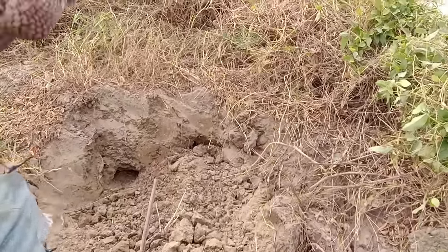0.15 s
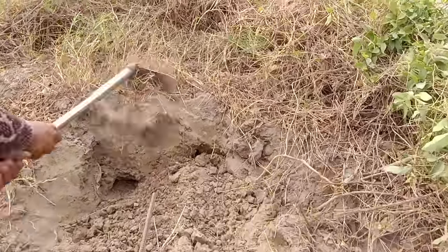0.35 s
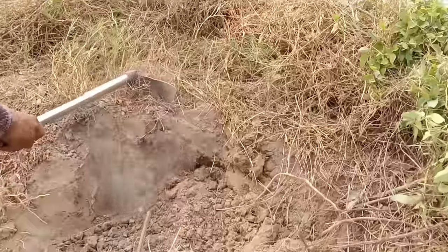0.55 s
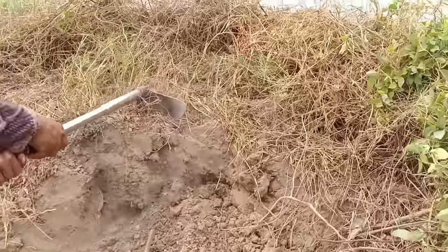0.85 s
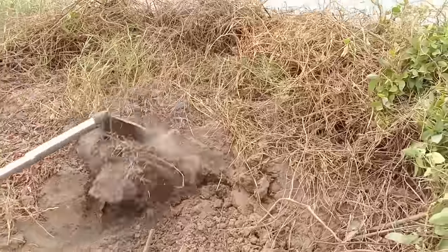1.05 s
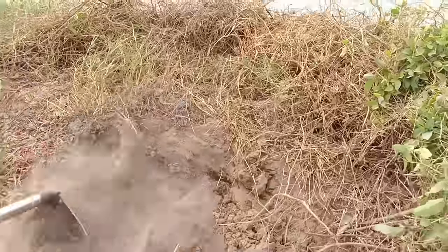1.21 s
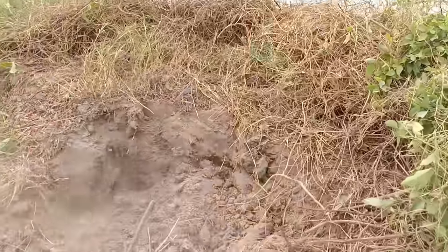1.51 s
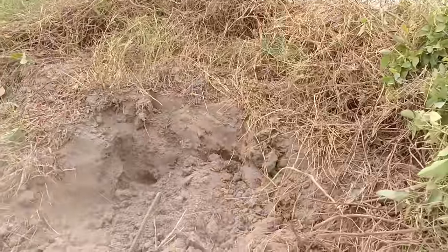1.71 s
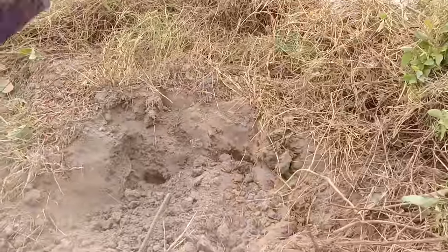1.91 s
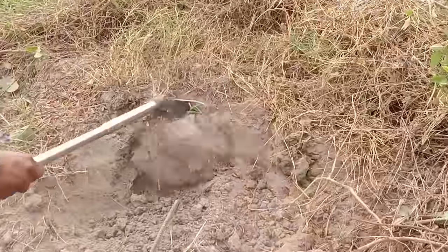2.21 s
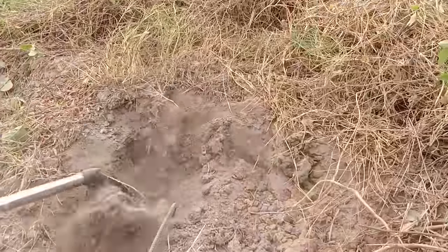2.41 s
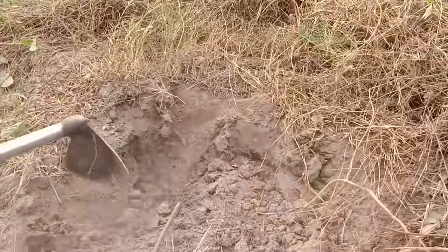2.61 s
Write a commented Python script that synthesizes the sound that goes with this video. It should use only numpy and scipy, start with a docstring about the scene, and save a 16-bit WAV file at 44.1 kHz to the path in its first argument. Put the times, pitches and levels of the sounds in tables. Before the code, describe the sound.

A metal hoe hits dry soil at 0.24 s with a sharp crunch, low thud and faint ring. Quiet stalk snaps lead to a gritty drag at 0.88-1.3 s, with cracking clods and stone scrapes clinking on the blade. Crumbs settle; tiny bird chirps begin near 1.55. A second, softer-edged chop lands at 2.06, dragging follows at 2.2-2.45, then the blade sings while earth slides over faint low rumble.

```python
"""A low rumble lies under it all; a steel hoe chops through stalks into dry soil, then dry stalks snap high.
The hoe is dragged back: clods crumble and crack, and scraping grit makes the blade ring.
A bird whistles falling and rising notes around a second chop and drag; then the lifted blade sings as earth slides.
Soil and stalks are coloured clicks and hiss, steel and ground decaying sine modes, the bird gliding sines."""
import sys
import numpy as np
from scipy import signal
from scipy.fft import rfft, irfft, next_fast_len
from scipy.io import wavfile
from scipy.ndimage import uniform_filter1d, map_coordinates

SR = 44100
rng = np.random.default_rng(int(sys.argv[2]) if len(sys.argv) > 2 else 0)


def wav_record(signal):
    """Record a signal, one row per channel, as 16-bit PCM in the file named by sys.argv[1]."""
    frames = np.transpose(np.atleast_2d(signal))
    bounded = np.clip(frames, -1, 1)
    # unit amplitude maps onto the largest positive 16-bit level
    quanta = np.round(bounded * 32767).astype(np.int16)
    wavfile.write(sys.argv[1], SR, quanta)


N = 121275
T = np.arange(N) / SR


def amp(db):
    """dB to amplitude."""
    return 10 ** (np.asarray(db) / 20)


def unit(x):
    """x at rms 1."""
    return x / np.sqrt(np.mean(x ** 2) + 1e-20)


def impulse(s):
    """A single unit sample at time s."""
    return 1. * (np.arange(N) == round(s * SR))


def along(points, hz, below_db, above_db):
    """(Hz, dB) points interpolated on a log frequency axis; None holds the end value."""
    f, db = np.transpose(points)
    return np.interp(np.log(hz + 1), np.log(f), db, below_db, above_db)


def filtered(x, response):
    """x times a zero-phase response of frequency."""
    m = next_fast_len(N + SR)
    return irfft(rfft(x, m) * response(np.fft.rfftfreq(m, 1 / SR)), m)[:N]


def coloured(x, points, tilt_db_per_oct=0, above_db=None):
    """x shaped by (Hz, dB) points and a tilt about 2 kHz, scaled to rms 1 below 9 kHz."""
    def response(hz):
        return amp(along(points, hz, -90, above_db) + tilt_db_per_oct * np.log2(hz / 2000 + .01))
    y = filtered(x, response)
    return y / np.std(filtered(y, lambda hz: hz < 9000))


def wobble(knots_per_s):
    """A smooth random curve."""
    return map_coordinates(rng.standard_normal(N // 10), [T * knots_per_s])


def gritty(per_s, spread_db, hiss):
    """Random clicks of uneven size at rms 1, plus hiss at the given rms."""
    sizes = amp(spread_db * np.minimum(rng.exponential(size=N), 3))
    clicks = (rng.random(N) < per_s / SR) * rng.standard_normal(N) * sizes
    return unit(clicks) + hiss * rng.standard_normal(N)


def patchy(x, depth_db):
    """x with random patches of gain in time and frequency, at rms 1."""
    z = signal.stft(x, nperseg=256)[2]
    patches = uniform_filter1d(rng.standard_normal(z.shape), size=5, axis=0)
    patches = uniform_filter1d(patches, size=6, axis=1)
    return unit(signal.istft(z * amp(depth_db * unit(patches)), nperseg=256)[1][:N])


def ring(x, modes):
    """x drives (Hz, dB, t60) modes; a unit impulse starts each at its dB."""
    t = T[:SR // 2]
    response = sum(amp(db - 60 * t / t60) * np.sin(2 * np.pi * hz * t) for hz, db, t60 in modes)
    return signal.fftconvolve(x, response)[:N]


# chops: (meets stalks [s], meets soil [s], crunch level [dB], stalks re crunch [dB], hold [s],
#         fade t60 [s], crunch tilt [dB/octave], thud gain [dB], ring gain [dB])
CHOP_EVENTS = [(0.223, 0.242, -9.5, -3, 0.0071, 0.0075, 0, -24, -30.5),
               (2.047, 2.0619, -10.5, -6.5, 0.0043, 0.042, -3.5, -24, -30.5)]
# crunch spectrum: (frequency [Hz], level [dB])
CRUNCH_SPECTRUM = [(150, -17.5), (900, -2), (1300, -6), (2000, -5.5), (2900, -8), (3500, -2.5), (6000, -13)]
# torn stalks spectrum: (frequency [Hz], level [dB])
STALK_SPECTRUM = [(600, -8), (3200, -7), (4200, 10.5), (6400, -0.5)]
# ground modes: (frequency [Hz], relative level [dB], t60 [s])
GROUND_MODES = [(65, -31, 0.17), (125.2, -0.5, 0.15), (196.4, 8.5, 0.051)]
# blade modes: (frequency [Hz], edge-struck rel. level [dB], face-scraped rel. level [dB], free t60 [s])
BLADE_MODES = [(965, -6, -6, .28), (1480, -25, -10, .2), (1930, -25, -13, .15), (3480, -22, -5, .25),
               (3812, -12, -36, 1.1), (4182, -14, -4, .4), (4435, -30, -3, .2), (4490, -1, -30, .35),
               (5210, -24, -6, .15), (5555, -24, -3, .33), (5916, -24, -12, .3), (6110, -14, -4, .15)]
STALK_RISE_DB = 48
SETTLE_DB, SETTLE_T60_S = -9.5, 0.05  # loose earth after a chop
CHOP_T60_SHARE = 0.71  # of the blade's free t60, left in the soil


def chops():
    """The blade tears stalks, crunches into soil, thuds the ground modes and rings its own."""
    out = np.zeros(N)
    for start, s, db, stalk_db, hold, fade, tilt_db, thud_db, ring_db in CHOP_EVENTS:
        after = np.maximum(T - s - hold, 0)
        rise_db = STALK_RISE_DB * np.minimum((T - s) / (s - start), 0)
        stalk_env = amp(stalk_db + rise_db - 60 * after / fade) * (T > start)
        attack = np.clip((T - s) / .001, 0, 1)
        crunch_env = attack * (amp(-60 * after / fade) + amp(SETTLE_DB - 60 * after / SETTLE_T60_S))
        stalks = stalk_env * coloured(rng.standard_normal(N), STALK_SPECTRUM)
        crunch = crunch_env * coloured(gritty(5600, 2.1, hiss=0.98), CRUNCH_SPECTRUM, tilt_db)
        out += amp(db) * (stalks + crunch)
        blow = impulse(s + hold / 2)
        modes = [(hz, ring_db + struck_db + rng.normal(0, 0.77), t60 * CHOP_T60_SHARE)
                 for hz, struck_db, _, t60 in BLADE_MODES]
        out += amp(thud_db) * ring(blow, GROUND_MODES) + ring(blow, modes)
    return out


# moving earth and dry leaves: (time [s], grit level [dB], clods level [dB], fine dust level [dB])
EARTH_LEVELS = [(0, -58, -59, -65.5), (0.298, -49, -53, -51), (0.36, -55, -67, -68), (0.52, -60, -62, -64),
                (0.659, -48.5, -61, -53.5), (0.711, -54.5, -66, -61.5), (0.801, -57, -68.5, -51.5),
                (0.879, -35.5, -63, -38), (0.902, -28.5, -35.5, -40.5), (0.962, -30, -34, -27.5),
                (1.04, -30, -45.5, -38.5), (1.1, -40, -53.5, -42), (1.141, -38.5, -63, -47),
                (1.16, -27.5, -36.5, -31.5), (1.24, -35, -43.5, -43.5), (1.32, -40.5, -64.5, -52),
                (1.375, -41, -39, -55), (1.43, -47, -61, -60), (1.54, -52, -53, -52.5),
                (1.65, -50, -57.5, -56.5), (1.728, -57, -45, -61.5), (1.787, -58, -56, -65.5),
                (1.878, -53, -54, -54.5), (1.96, -60.5, -65.5, -64), (2.121, -49.5, -54, -60.5),
                (2.17, -38, -57.5, -53), (2.221, -31.5, -49.5, -48), (2.289, -46, -66, -59),
                (2.303, -19.5, -32.5, -34.5), (2.349, -22.5, -30, -32.5), (2.412, -31.5, -34.5, -39),
                (2.548, -46, -81, -54), (2.75, -64, -60.5, -65)]
# grit spectrum: (frequency [Hz], level [dB])
GRIT_SPECTRUM = [(1100, -10.5), (1700, -6.5), (4300, 1), (6600, -1), (7400, -18.5)]
# clods spectrum: (frequency [Hz], level [dB])
CLOD_SPECTRUM = [(120, -18), (220, -9), (330, -8), (560, -1.5), (1300, -7), (2400, -5.5)]
# fine dust spectrum: (frequency [Hz], level [dB])
DUST_SPECTRUM = [(6300, -13.5), (8000, -8.5)]
LOADED_T60_S, LOADED_DB = 0.091, -10  # blade under soil: mode t60, level in the grit


def drags():
    """Grit, clods and dust move in uneven grains; grit also drives the damped blade."""
    s, *columns = np.transpose(EARTH_LEVELS)
    grit_env, clod_env, dust_env = [amp(np.interp(T, s, db)) for db in columns]
    lumps = amp(2 * wobble(120))
    grains = gritty(1200, 3.5, hiss=0.9)
    loaded_blade = unit(ring(grains, [(hz, db, LOADED_T60_S) for hz, _, db, _ in BLADE_MODES]))
    grit = coloured(grains, GRIT_SPECTRUM, above_db=-87) + amp(LOADED_DB) * loaded_blade
    clods = coloured(gritty(400, 4.8, hiss=1.53), CLOD_SPECTRUM, above_db=-80.5)
    dust = coloured(gritty(2500, 2.4, hiss=0.88), DUST_SPECTRUM)
    out = grit_env * lumps * patchy(grit, depth_db=3)
    out += clod_env * lumps * patchy(clods, depth_db=2)
    return out + dust_env * dust + slide(lumps)


SLIDE_START_S, SLIDE_DB, SLIDE_T60_S, SLIDE_HZ = 2.448, -37.5, 0.7, 356


def slide(lumps):
    """Earth slides back: resonant grit, a dull rumble sharing the drag's lumps."""
    env = amp(SLIDE_DB - 60 * (T - SLIDE_START_S) / SLIDE_T60_S)
    env = env * np.clip(20 * (T - SLIDE_START_S), 0, 1)
    grit = signal.lfilter(*signal.iirpeak(SLIDE_HZ, 1, SR), gritty(510, 1.1, hiss=1))
    return env * lumps * unit(grit)


# soft clods landing: (time [s], level [dB], pitch [Hz])
CLOD_THUMPS = [(0.931, -33, 206.4), (1.175, -44.5, 219), (1.383, -47.5, 241)]
THUMP_T60_S = 0.15


def thumps():
    """Each landing clod sounds one low decaying sine."""
    return sum(ring(impulse(s), [(hz, db, THUMP_T60_S)]) for s, db, hz in CLOD_THUMPS)


# stones on the blade: (time [s], fade t60 [s], blow level [dB], mode tilt [dB/octave])
STONE_SCRAPES = [(1.025, 0.09, -25.5, -5), (1.036, .06, -16, -3), (1.157, 0.064, -16, 7),
                 (1.176, 0.14, -17.5, 4.5), (1.209, 0.093, -20.5, 9), (2.301, 0.032, -29, -1.5),
                 (2.325, 0.059, -24, 0), (2.379, 0.024, -28.5, 8), (2.452, 0.15, -22.5, 3)]
SING_START_S, SING_DB = 2.47, -29  # the lifted blade
PRESSED_T60_SHARE, FREE_RING_DB = .17, -14  # t60 share under a stone; level of the free ring
RASP_DB = 3  # broad grit under the modes


def scrapes():
    """Stones drive blade modes with grit: damped clink, weak free ring; lifted, the two longest modes sing."""
    longest = sorted(BLADE_MODES, key=lambda mode: mode[-1])[-2:]
    out = ring(impulse(SING_START_S), [(hz, SING_DB + db, t60) for hz, db, _, t60 in longest])
    for s, fade, db, tilt_db in STONE_SCRAPES:
        drive = (T > s) * amp(-60 * np.abs(T - s) / fade) * gritty(2500, 0.8, hiss=0.66)
        drive = amp(db) * drive / np.linalg.norm(drive)
        modes = [(hz, face_db + tilt_db * np.log2(hz / 4000) + rng.normal(0, 1.1), t60)
                 for hz, _, face_db, t60 in BLADE_MODES]
        pressed = [(hz, mode_db, t60 * PRESSED_T60_SHARE) for hz, mode_db, t60 in modes]
        free = [(hz, mode_db + FREE_RING_DB, t60) for hz, mode_db, t60 in modes]
        out += ring(drive, pressed + free)
        out += amp(RASP_DB) * np.std(drive) * coloured(drive, GRIT_SPECTRUM, above_db=-43.5)
    return filtered(out, lambda hz: 1 / (1 + (750 / (hz + 1)) ** 8))  # thin steel has no bass


# clods and stalks cracking: (time [s], peak level [dB], pitch [Hz])
CRACK_EVENTS = [(0.342, -35, 3500), (0.61, -35.5, 1450), (0.89, -15, 3500), (0.899, -21, 4500),
                (0.9145, -12, 4000), (0.915, -19, 950), (0.92, -10, 4200), (0.9425, -13, 4800),
                (0.953, -14, 3900), (0.9695, -14, 4000), (0.972, -9, 5500), (1.005, -16, 2200),
                (1.085, -19, 1800), (1.373, -20, 1490), (1.386, -26, 4000), (1.405, -23, 2010),
                (1.437, -32, 2500), (1.53, -35, 3000), (1.656, -33, 3640), (2.198, -18, 4190),
                (2.205, -27, 950), (2.363, -11, 3500), (2.383, -11, 4500), (2.636, -35, 1500)]
CRACK_T60_S = .005  # of the noise fed to the resonance


def cracks():
    """A decaying noise burst through a broad resonance per crack."""
    out, t = np.zeros(N + SR), T[:SR // 20]
    for s, db, hz in CRACK_EVENTS:
        burst = amp(-60 * t / CRACK_T60_S) * rng.standard_normal(len(t))
        crack = signal.lfilter(*signal.iirpeak(hz, 1.2, SR), burst)
        out[round(s * SR):][:len(t)] += amp(db) * crack / np.abs(crack).max()
    return out[:N]


# dry stalks snapping: (time [s], level [dB])
SNAP_EVENTS = [(0.38, -34.5), (0.387, -38.5), (0.5359, -32.5), (0.5399, -39), (0.564, -38), (0.5707, -34),
               (0.5863, -39.5), (0.8353, -20.5)]
SNAP_HZ, SNAP_HALF_WIDTH_HZ, SNAP_RISE_S = 7960, 530, 0.0029


def snaps():
    """Bell-shaped bursts of narrow high noise over a faint broad hiss."""
    env = np.zeros(N)
    for s, db in SNAP_EVENTS:
        env += amp(db) * np.exp(-((T - s) / SNAP_RISE_S - 1) ** 2 * 2)

    def band(hz):
        return 1 / (1 + ((hz - SNAP_HZ) / SNAP_HALF_WIDTH_HZ) ** 2) + 0.04 * (hz > 3000)
    return env * unit(filtered(rng.standard_normal(N), band))


# falling notes: (time [s], level [dB], start pitch [Hz])
FALLING_NOTES = [(1.708, -37, 3500), (1.862, -25, 3806), (2.019, -21, 3860), (2.169, -25, 4090),
                 (2.485, -23.5, 3960)]
# rising notes: (time [s], level [dB], start pitch [Hz])
RISING_NOTES = [(1.561, -36, 1554), (1.75, -37.5, 1763), (1.904, -35.5, 1846), (2.53, -38, 1816)]
# short pips: (time [s], level [dB], pitch [Hz])
PIP_NOTES = [(2.572, -39.5, 3507), (2.728, -39, 3450)]
FALL_S, FALL_HZ_PER_S, FALL_FADE_DB_PER_NOTE = 0.022, 105000, 59  # fade runs from 0.2 to 0.5 of the note
RISE_S, RISE_HZ, RISE_TOP_SHARE = 0.0232, 603, 0.806  # length, arch height, share of the note at its top
PIP_S = .018
ECHO_DB, ECHO_T60_S = -3.5, 0.039


def bird():
    """Gliding sines: steep fading falls, small arches, level pips; the bushes smear them."""
    out = np.zeros(N)

    def note(s, length, hz, db):
        u = np.clip((T - s) / length, 0, 1)
        env = amp(db(u)) * np.minimum(1, 6 * np.sin(np.pi * u))
        return env * np.sin(2 * np.pi * np.cumsum(hz(u)) / SR)
    for s, db, hz in FALLING_NOTES:
        out += note(s, FALL_S, lambda u: hz - FALL_HZ_PER_S * FALL_S * u,
                    lambda u: db - FALL_FADE_DB_PER_NOTE * np.clip(u - .2, 0, .3))
    for s, db, hz in RISING_NOTES:
        out += note(s, RISE_S, lambda u: hz + RISE_HZ * (1 - (1 - u / RISE_TOP_SHARE) ** 2),
                    lambda u: db - 25 * (u - .55) ** 2)
    for s, db, hz in PIP_NOTES:
        out += note(s, PIP_S, lambda u: hz + 0 * u, lambda u: db - 5 * u)
    t = T[:SR // 4]
    tail = amp(-60 * t / ECHO_T60_S) * rng.standard_normal(len(t)) * (t > .003)
    return out + amp(ECHO_DB) * signal.fftconvolve(out, tail / np.linalg.norm(tail))[:N]


# rumble spectrum: (frequency [Hz], level [dB])
RUMBLE_SPECTRUM = [(25, -47), (45, -13.5), (88, 4), (200, -14), (320, -22)]
RUMBLE_DB = -54.5


def rumble():
    """Low noise whose level wavers slightly."""
    level = amp(RUMBLE_DB + 0.43 * wobble(7.67))
    return level * coloured(rng.standard_normal(N), RUMBLE_SPECTRUM, above_db=-80)


def scene():
    """All sources summed to one channel."""
    hoe = chops() + drags() + thumps() + scrapes()
    return (hoe + cracks() + snaps() + bird() + rumble())[None]


# microphone response: (frequency [Hz], level [dB])
MICROPHONE_RESPONSE = [(35, -9.5), (70, -2.5), (8300, -1.5), (9600, -15.5), (10400, -23.5), (12800, -30.5),
                       (13700, -29.5), (14400, -39.5), (15500, -57.5)]
TOP_HZ = 15620


def record(dry):
    """The microphone thins deep bass and dulls treble, rounds off loud peaks, passes nothing above TOP_HZ."""
    heard = filtered(dry[0], lambda hz: amp(along(MICROPHONE_RESPONSE, hz, None, None)))
    soft = heard / (1 + np.abs(heard) ** 8) ** (1 / 8)
    return filtered(soft, lambda hz: hz < TOP_HZ)[None]


dry = scene()
out = record(dry)
wav_record(out)
```